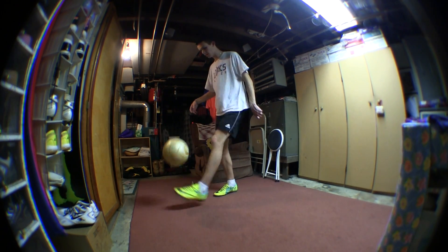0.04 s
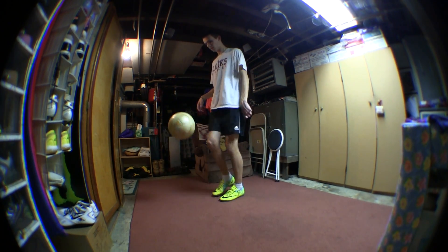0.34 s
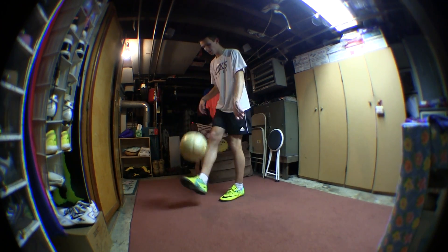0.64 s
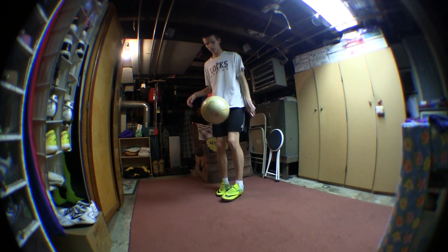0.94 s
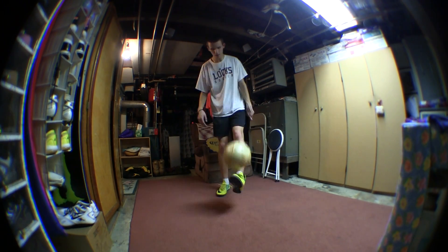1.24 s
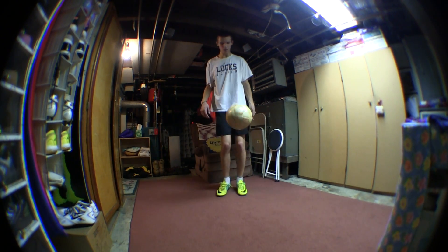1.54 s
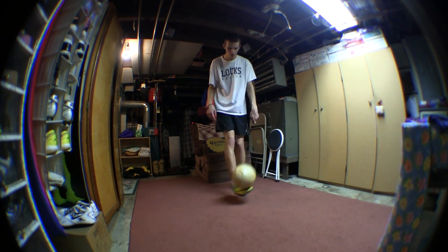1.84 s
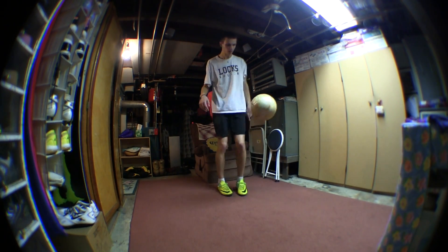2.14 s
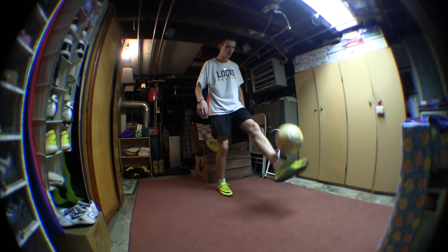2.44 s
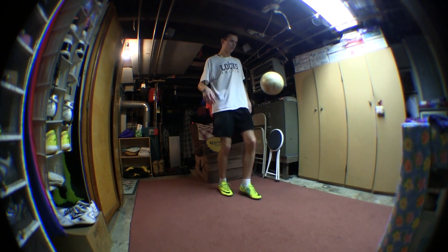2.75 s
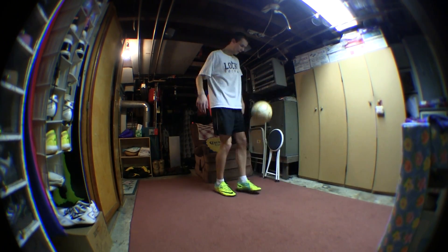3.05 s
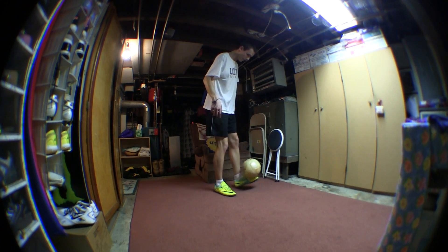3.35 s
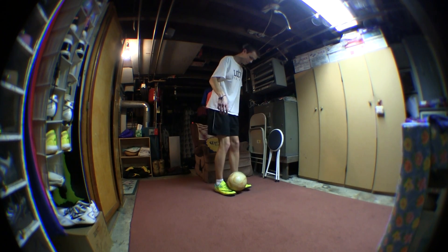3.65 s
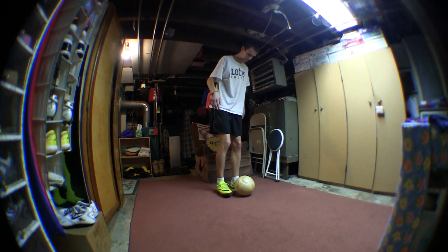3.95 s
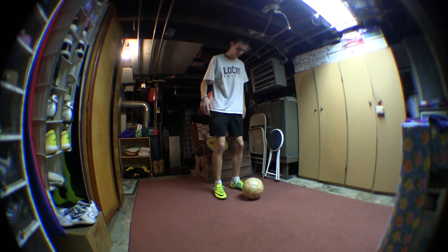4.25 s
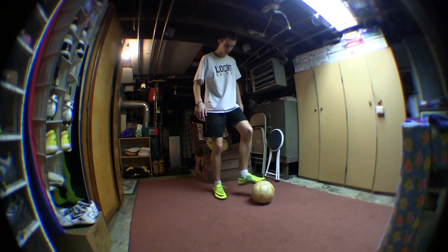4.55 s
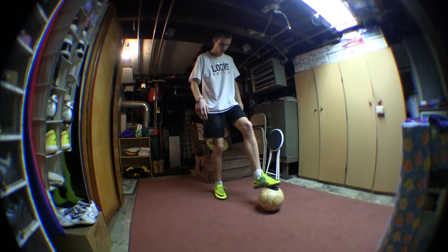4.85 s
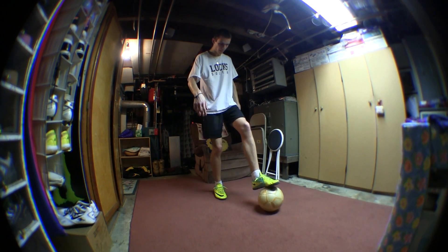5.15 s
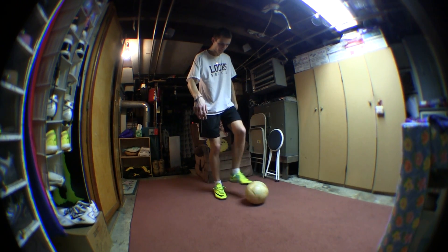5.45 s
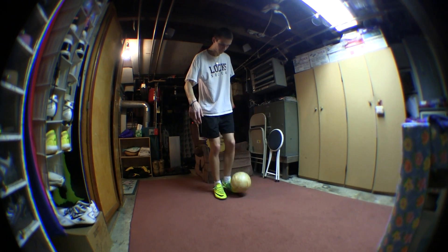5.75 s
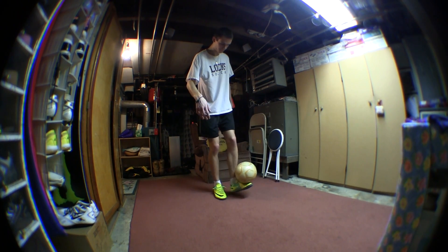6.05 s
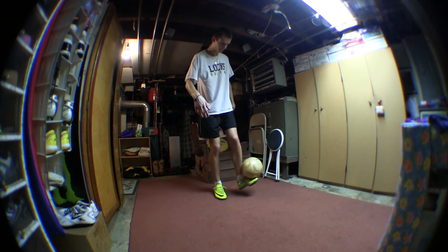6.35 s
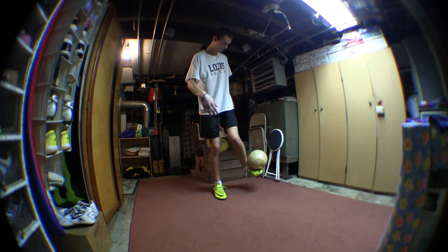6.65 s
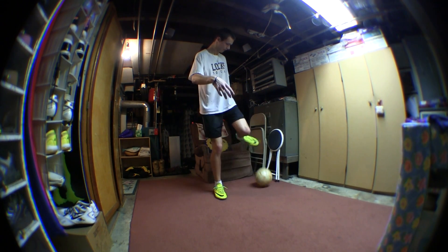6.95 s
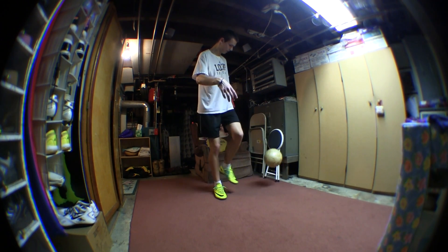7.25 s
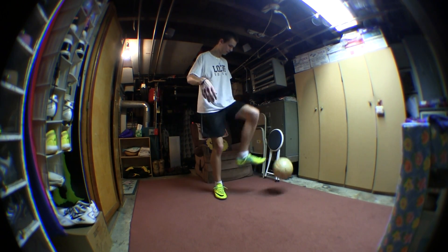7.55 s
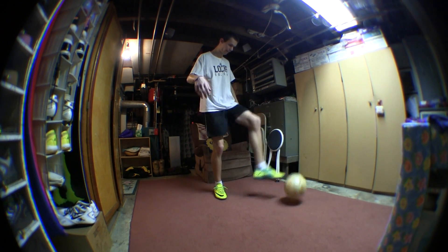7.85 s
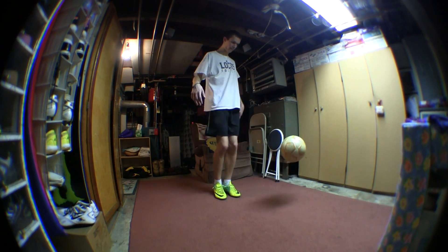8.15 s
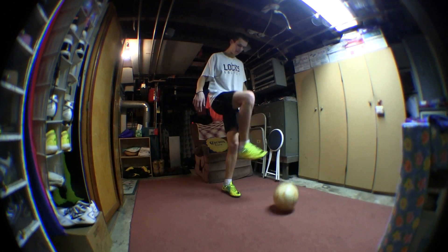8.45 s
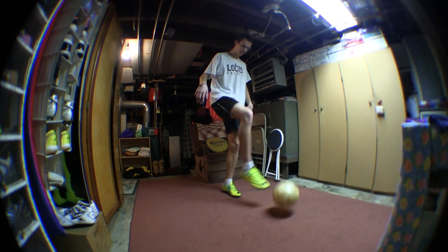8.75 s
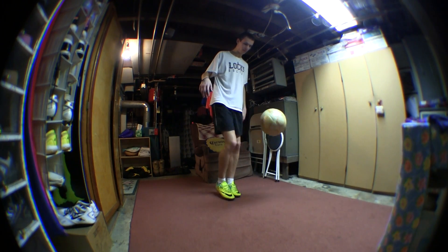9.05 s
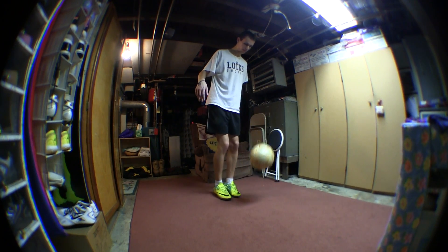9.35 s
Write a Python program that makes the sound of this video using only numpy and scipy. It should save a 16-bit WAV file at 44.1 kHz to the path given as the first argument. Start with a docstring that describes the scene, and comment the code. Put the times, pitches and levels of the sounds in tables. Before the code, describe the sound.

A football is kicked with sharp slaps, rolled softly, then thumped into carpet in a small room with a fan humming faintly.

```python
"""A football is juggled on shoe and thigh in a cluttered, carpeted basement, then rolled under the sole
and slapped down into the floor three times. Each blow is a pulse that rings the air in the ball and the
low modes of the room. Between kicks the ball brushes the leg, shoes scuff and clothes rustle.
Underneath, the fan of a nearby machine lays down a soft bed of air and hum."""
import sys
import numpy as np
from scipy import signal
from scipy.fft import rfft, irfft
from scipy.io import wavfile

SR = 44100
rng = np.random.default_rng(int(sys.argv[2]) if len(sys.argv) > 2 else 0)


def store_pcm(level_fs):
    """Save levels as 16-bit WAV."""
    pcm = np.round(np.clip(level_fs, -1, 1) * 32767).astype(np.int16)
    wavfile.write(sys.argv[1], SR, np.atleast_2d(pcm).T)


N = 414099
SIZE = 32768  # samples in a one-shot
T = np.arange(SIZE) / SR
HZ = np.arange(SIZE // 2 + 1) * SR / SIZE


def undb(db):
    """Decibels to gain."""
    return np.exp(np.asarray(db) * np.log(10) / 20)


def level(x, db):
    """Scale to an rms level."""
    return x * undb(db) / np.sqrt(np.mean(x ** 2))


def curve(points, hz):
    """Join (frequency, value) points on a log-frequency axis."""
    f, value = np.transpose(points)
    return np.interp(np.log(np.maximum(hz, 1)), np.log(f), value)


def causal(points):
    """Minimum-phase response of an EQ curve: nothing sounds before the blow."""
    cepstrum = irfft(np.log(undb(curve(points, HZ))))
    cepstrum[1:SIZE // 2] *= 2
    cepstrum[SIZE // 2 + 1:] = 0
    return np.exp(rfft(cepstrum))


def eq(x, points):
    """Colour a sound by (frequency [Hz], gain [dB]) points."""
    return signal.fftconvolve(x, irfft(causal(points)))[:len(x)]


def cut(x, hz, kind, order=2):
    """Butterworth filter."""
    return signal.sosfilt(signal.butter(order, hz, kind, fs=SR, output="sos"), x)


def band(x, hz, width_hz):
    """One resonance, gain 1 at its centre."""
    return signal.lfilter(*signal.iirpeak(hz, hz / width_hz, fs=SR), x)


def ring(modes):
    """Impulse response of damped modes, each with its dB as the gain at resonance."""
    hz, db, t60 = np.transpose(modes)[:, :, None]
    damping = np.log(1000) / t60
    envelopes = 2 * damping / SR * undb(db) * np.exp(-damping * T)
    return np.sum(envelopes * np.cos(2 * np.pi * hz * T), axis=0)


def stereo(mid, side):
    """Left and right from mid and side."""
    return np.array([mid + side, mid - side])


def add(out, s, sound):
    """Drop a one-shot into a track at a time."""
    i = int(s * SR)
    out[..., i:i + SIZE] += sound[..., :N - i]


def gesture(s, rise, hold, fall):
    """Envelope of one movement: it builds up, then dies away from `hold` seconds after its start."""
    t = np.arange(N) / SR - s
    return np.clip(t / rise, 0, 1) * np.exp(-np.maximum(t - hold, 0) / fall)


def friction(length, rise, fall, rough):
    """Uneven grains of a rub, and the envelope of its stroke."""
    grains = rng.standard_normal(SIZE) * np.exp(rough * np.repeat(rng.standard_normal(SIZE // 32), 32))
    return level(grains, 0), gesture(0, rise, length, fall)[:SIZE]


# EQ of the fan's air, and the further EQ of its side channel: (frequency [Hz], gain [dB])
FAN_AIR = [(18, -43.5), (30, -7.5), (86, -10.5), (124, -3.5), (149, -10.5), (184, -8.5), (328, -9.5),
           (355, -3.5), (473, -9.5), (666, -6), (866, -12), (2610, -14.5), (16000, -27.5)]
FAN_WIDTH = [(60, -12.5), (110, -8.5), (200, -1), (380, -2), (700, -3.5), (1290, -4.5), (2380, -8.5),
             (4400, -8), (8120, -6.5), (15000, -4.5)]
# tones of motor and housing: (frequency [Hz], relative level [dB])
HUM_TONES = [(120, -98.5), (180, -78.5), (360, -86.5), (511, -73.5), (574, -75), (630, -76), (665, -81),
             (802, -77), (1437, -79), (1620, -80.5), (1705, -78)]
# the hum slowly dips and swells: (time [s], gain [dB])
HUM_SWELL = [(0, 4), (5.2, -1.5), (6.5, 1.2), (9.3, 3)]


def machine(air_db=-60.64, hum_trim_db=-1, waver=5):
    """A fan: an even bed of air under the wavering tones of its motor and housing."""
    mid, side = (level(eq(rng.standard_normal(N), FAN_AIR), air_db) for _ in range(2))
    air = stereo(mid, eq(side, FAN_WIDTH))
    t = np.arange(N) / SR
    knots = np.arange(0, t[-1] + 1, 1 / 24)
    hum = 0
    for hz, db in HUM_TONES:
        drift_hz = np.interp(t, knots, waver * rng.standard_normal(len(knots))) * np.sqrt(hz / 500)
        tone = np.sin(2 * np.pi * np.cumsum(hz + drift_hz) / SR)
        hum = hum + level(tone, db + hum_trim_db)
    return air + hum * undb(np.interp(t, *np.transpose(HUM_SWELL)))


# a foot slides or rolls the ball over the carpet: (time [s], length [s], level [dB])
FOOT_SLIDES = [(1.654, 0.091, -61.5), (2.97, 0.27, -62.5), (4.246, 0.1, -60.5), (4.483, 0.18, -59.5),
               (4.705, 0.21, -62.5), (5.398, 0.35, -64.5), (5.98, 0.06, -60.5), (6.48, 0.047, -61.5),
               (8.238, 0.27, -63.5)]


def rustle(stir_db=-79, swing_db=-40.5, flicker_db=2.0, side_db=-7):
    """Cloth and carpet fibres catch and slip as the body stirs, a leg swings or a foot slides."""
    fibres = [(300, -2.5), (900, 1.5), (1600, 1.5), (2200, 1.0), (3200, -3.5), (5200, -5.5),
              (8000, -17.5), (16000, -19)]
    mid, side = (level(eq(rng.standard_normal(N), fibres), db) for db in (0, side_db))
    catches = level(cut(rng.standard_normal(N), 30.4, "lowpass"), 0)
    # the leg swings back after each kick, louder after a stronger one
    swings = [undb(db + swing_db) * gesture(s, rise=0.17, hold=0.36, fall=0.29) for s, db, *_ in KICKS]
    slides = [undb(db) * gesture(s, rise=0.032, hold=length, fall=0.13) for s, length, db in FOOT_SLIDES]
    motion = np.sqrt(undb(stir_db) ** 2 + sum(move ** 2 for move in swings + slides))
    return stereo(mid, side) * motion * undb(flicker_db * catches)


# shoe and cloth foley: (time [s], length [s], level [dB], centre [Hz], bandwidth [Hz])
SCUFFS = [(0.029, 0.003, -47, 2030, 3030), (.958, 0.015, -41.5, 1560, 1300), (1.262, .003, -50, 2250, 1800),
          (1.494, 0.011, -48, 1490, 1200), (1.664, 0.0076, -53, 13500, 900), (1.739, 0.067, -62, 2050, 800),
          (2.037, 0.072, -56, 1980, 800), (2.875, 0.078, -54.5, 2190, 4470),
          (2.914, .035, -60.5, 5500, 2400), (4.332, .008, -57, 7000, 11000),
          (4.84, 0.011, -51.5, 7200, 10100), (5.033, 0.0033, -52, 2400, 3000),
          (5.517, 0.028, -58, 3100, 3460), (5.614, .02, -61, 4370, 3500), (5.738, .0071, -45.5, 5200, 2400),
          (5.912, 0.024, -61, 3500, 5000), (7.53, 0.041, -55.5, 1550, 2200),
          (8.18, 0.031, -55.5, 2630, 5400)]


def scuffs():
    """Shoes and clothes scuff and squeak: short strokes of friction through a resonant band."""
    out = np.zeros(N)
    for s, length, db, hz, width_hz in SCUFFS:
        grains, stroke = friction(length, rise=0.057 * length, fall=0.23 * length, rough=0.17)
        squeak = band(band(grains, hz, width_hz), hz, width_hz)
        add(out, s, stroke * level(squeak, db))
    return out


# reverb time of the basement: (frequency [Hz], t60 [s])
ROOM_DECAY = [(300, 0.19), (1000, 0.2), (3000, 0.16), (6000, 0.16), (14000, 0.13)]


def reverb(burst_db=4, burst_t60=0.11, tail_db=6.0, grain=0.88, low_cut_hz=330, treble_db=-4):
    """Diffuse reflections: a quick grainy burst from the clutter, then the tail of the room."""
    spectrum = rfft(rng.standard_normal(SIZE))
    centres = np.transpose(ROOM_DECAY)[0]
    tail = sum(irfft(spectrum * curve(np.c_[centres, share], HZ)) * undb(-60 * T / t60)
               for share, (_, t60) in zip(np.eye(len(centres)), ROOM_DECAY))
    burst = rng.standard_normal(SIZE) * np.exp(grain * rng.uniform(-0.77, 1.97, SIZE))
    burst *= undb(-60 * T / burst_t60)
    wet = undb(burst_db) * burst / np.linalg.norm(burst) + undb(tail_db) * tail / np.linalg.norm(tail)
    absorbed = (1 - undb(treble_db)) * cut(wet, 3000, "highpass", order=1)  # by carpet and cloth
    return cut(wet - absorbed, low_cut_hz, "highpass")


# EQ of the reverb's side channel: (frequency [Hz], gain [dB])
ROOM_WIDTH = [(100, -9), (500, -18), (1200, -13.5), (2800, -11.5), (5500, -8.5), (9000, 0), (14000, -6.5)]


def in_room(mono, send_db=-6, trim_db=-3):
    """The basement's reflections spread a mono sound into stereo."""
    mid, side = (undb(send_db) * signal.fftconvolve(mono, reverb())[:N] for _ in range(2))
    return undb(trim_db) * (mono + stereo(mid, eq(side, ROOM_WIDTH)))


# a quick second pulse from the air inside the ball, then slap off the nearest surfaces: (delay [ms], gain
# [linear])
EARLY_ECHOES = [(.7, -0.16), (2.8, -0.57), (5.0, -0.36), (7.2, -0.28), (11.7, -0.39), (17, -0.14),
                (19, 0.45), (48, 0.053)]


def early_paths(direct):
    """A blow arrives straight, echoes once inside the ball, then comes off the nearest surfaces."""
    paths = np.zeros(SIZE)
    for ms, gain in EARLY_ECHOES:
        paths[int(ms * SR / 1000)] += gain
    paths = cut(paths, 446, "highpass", order=1)  # small surfaces return no bass
    paths[0] += direct
    crack = cut(signal.unit_impulse(SIZE), 2500, "highpass", order=1)  # mostly takes the straight path
    return paths + .8 * crack


# ping of the air in the ball, and boom of the basement: (frequency [Hz], gain [dB], t60 [s])
BALL_MODES = [(865, 16.5, 0.16), (936, 12.5, 0.07), (1021, 4, 0.06), (1132, 4.5, .19), (1152, 13, 0.152),
              (1228, 14.5, 0.1), (1345, 2.5, 0.138), (1475, 1, 0.072), (1810, 15, 0.042), (2163, 2, 0.209),
              (2165, 12.5, 0.1), (2600, -8, 0.19), (3805, 4, 0.1), (4455, 15, .16), (4460, -2.5, 0.13),
              (5070, 6.5, .16), (5500, 3.5, 0.158)]
ROOM_MODES = [(63, 5.5, 1), (76.8, 19, 0.19), (85.9, -0.5, 1), (111.8, 12.5, 0.12), (130, 5, 0.15),
              (164.9, 6.5, 0.18), (180.8, 9, .22), (216.5, -1, .2), (269, 5.5, 0.27), (307.6, 11, 0.13),
              (346.5, 6.5, 0.28), (375.4, 10.5, 0.17), (420, 7.5, 0.21), (549, 7.5, 0.28), (647, 6.5, 0.23)]
# borders of the thump, knock, slap, crack and tick registers: (frequency [Hz])
REGISTER_EDGES = [50, 220, 700, 2200, 7000, 16000]


def blows(hits, contact, balance_db, body, trim_db, ball_db, low_cut_hz, direct=0.32, dent_t60=0.0182):
    """Each contact rings the dented skin, the ball and the room; a harder one tilts towards the treble."""
    out = np.zeros((2, N))
    clear = early_paths(direct) + body + undb(ball_db) * ring(BALL_MODES)
    push = rfft(cut(irfft(causal(contact)), low_cut_hz, "highpass", order=3))
    edges = np.array(REGISTER_EDGES)
    centres = np.sqrt(edges[:-1] * edges[1:])
    bins = np.searchsorted(HZ, edges)
    octaves = np.log2(centres / np.median(centres))
    width = causal(ROOM_WIDTH)
    for s, db, hardness, knock_db, *dent in hits:
        register_db = db + np.array(balance_db) + hardness * octaves
        register_db[1] += knock_db  # fuller or leaner low mids
        pulse = push * (1.3 + rfft(ring([(*dent, dent_t60)]))) if dent else push
        mid = rfft(clear + reverb()) * pulse
        side = rfft(reverb()) * pulse * width
        eq_db = np.zeros(len(centres))
        for _ in range(3):  # EQ each register to its level, as energy per 50 ms
            power = abs(mid * undb(curve(np.c_[centres, eq_db], HZ))) ** 2
            energy = np.add.reduceat(power, bins)[:-1] * 2 / SIZE / (.05 * SR)
            eq_db += register_db - 10 * np.log10(energy)
        tone = causal(np.c_[centres, eq_db]) * undb(trim_db)
        add(out, s, irfft(stereo(mid, side) * tone))
    return out


# shoe on ball: (time [s], level [dB], hardness [dB/octave], knock [dB], dent [Hz], dent gain [dB])
KICKS = [(0.0539, -19, 0.14, .3, 1480, 9), (0.6483, -21, -0.07, 2.5, 1240, 11),
         (1.2924, -22.5, -.9, 2, 910, -9), (1.9297, -20, 0.85, 2, 2060, 3),
         (2.5524, -22.5, -1.02, -.5, 640, 2), (3.3303, -24.5, -0.63, 0.5, 940, -15),
         (7.1425, -30.5, 0.3, 3.5, 1180, 1), (7.8816, -24, .5, -1.5, 1080, 8),
         (8.7381, -24, -0.36, -3.5, 750, 2)]
# colour of a shoe's contact: (frequency [Hz], gain [dB])
SHOE_EQ = [(60, -17.5), (120, -0.5), (250, 1), (520, 1.5), (780, 1), (1000, 5.5), (1600, 4), (2100, 0.5),
           (4500, -5), (6300, -13.5), (8500, -25.5), (12500, -26), (16000, -33.5)]
# voicing of a kick: (thump [dB], knock [dB], slap [dB], crack [dB], tick [dB])
KICK_VOICING = (-2.5, -3.5, 0, -3, -16)


def kicks(boom):
    """The shoe dents the ball: a bright slap, then the ping of the air inside."""
    return blows(KICKS, SHOE_EQ, KICK_VOICING, boom, trim_db=-0.5, ball_db=-2.5, low_cut_hz=65)


# ball along the leg: (time [s], length [s], rub [dB], hollow [dB], glide start [Hz], glide end [Hz])
LEG_BRUSHES = [(0.219, .086, -39, -42.5, 1022, 510), (0.872, 0.058, -39.5, -33.5, 1179, 470.6),
               (1.519, 0.0425, -37, -41.5, 860, 456), (2.153, 0.05, -44, -60, 767, 405)]


def brushes(flutter_hz=220):
    """The ball bumps and rubs the leg while the hollow between them sinks in pitch."""
    rub_eq = [(60, -27), (200, 4), (500, 1.5), (1000, -2.5), (2000, -4.5), (4500, -10), (6500, -20),
              (9000, -31.5), (16000, -39)]
    out = np.zeros(N)
    for s, length, rub_db, hollow_db, start_hz, end_hz in LEG_BRUSHES:
        grains, stroke = friction(length, rise=0.002, fall=0.0053, rough=0.66)
        rub = level(eq(grains, rub_eq), rub_db)
        bump = level(band(grains, hz=150, width_hz=160), rub_db - 1.5) * np.exp(-T / 0.025)
        glide_hz = start_hz * (end_hz / start_hz) ** np.minimum(T / length, 1)
        flutter = cut(rng.standard_normal((2, SIZE)), flutter_hz, "lowpass")
        hollow = np.real((flutter[0] + 1j * flutter[1]) * np.exp(2j * np.pi * np.cumsum(glide_hz) / SR))
        # the hollow opens as the ball leaves
        swell = gesture(0, rise=length / 2, hold=length, fall=0.0031)[:SIZE]
        add(out, s, bump + stroke * (rub + level(hollow, hollow_db) * swell))
    return out


# footfalls: (time [s], level [dB], hardness [dB/octave], knock [dB])
STEPS = [(.543, -61, 1, 6.5), (2.972, -56, -0.5, -3.5), (3.868, -60, 1.5, 1), (3.935, -63, 0.5, -5),
         (4.579, -54.5, -0.9, 2), (4.85, -66.5, -3, -1.5), (8.14, -55, -1.3, -13.5)]
# voicing of a step: (thump [dB], knock [dB], slap [dB], crack [dB], tick [dB])
STEP_VOICING = (-3, 4.5, -0.5, -6.5, -22)


def steps(boom):
    """A sole is set down with a soft knock."""
    return blows(STEPS, SHOE_EQ, STEP_VOICING, boom,
                 trim_db=-0.5, ball_db=-26.5, low_cut_hz=55, direct=.2)


# ball on thigh: (time [s], level [dB], hardness [dB/octave], knock [dB], dent [Hz], dent gain [dB])
THIGH_HITS = [(2.8112, -31.5, 0.5, 0.5, 547, 5)]
# colour of a contact with flesh: (frequency [Hz], gain [dB])
FLESH_EQ = [(60, -33), (140, -26), (220, -7), (550, -21), (850, -25), (1200, -35), (2400, -25),
            (4600, -16.5), (8000, -34), (16000, -51)]
# the hollow between ball and thigh: (frequency [Hz], gain [dB], t60 [s])
THIGH_MODES = [(322, 17.5, 0.13), (530, 4, 0.04), (740, 7.5, 0.041)]
# voicing of the thigh: (thump [dB], knock [dB], slap [dB], crack [dB], tick [dB])
THIGH_VOICING = (0, 9, -2.5, -15, -34.5)


def thigh(boom):
    """The ball lands on the thigh and rings the hollow between them: a round knock, hardly any ping."""
    body = undb(-1.0) * boom + ring(THIGH_MODES)
    return blows(THIGH_HITS, FLESH_EQ, THIGH_VOICING, body, trim_db=2.5, ball_db=-27, low_cut_hz=62)


# light touches on the ball, and a shoe scuff at 6.03 s: (time [s], level [dB], hardness [dB/octave], knock
# [dB])
TAPS = [(3.536, -48, 1.5, 2.5), (3.743, -43.5, .2, 0.5), (5.766, -47, -1.5, -1), (6.032, -62, 4, 8)]
# voicing of a tap: (thump [dB], knock [dB], slap [dB], crack [dB], tick [dB])
TAP_VOICING = (-5.5, -2.5, 0, -4.5, -17)


def taps(boom):
    """The foot taps the ball too lightly to dent it; the last is a scuff of the shoe."""
    return blows(TAPS, SHOE_EQ, TAP_VOICING, boom, trim_db=-2.5, ball_db=-10, low_cut_hz=50, direct=.2)


# ball on carpet: (time [s], level [dB], hardness [dB/octave], knock [dB], dent [Hz], dent gain [dB])
BOUNCES = [(7.0535, -31, 1.7, -3.4, 1300, 4), (7.195, -31.5, 0, -1, 880, -4),
           (7.7292, -31.5, 0.25, -1, 940, 6), (7.9617, -27, -0.05, 1, 1010, 10),
           (8.5541, -31.5, 0.16, -2.5, 860, 0), (8.8205, -24, -0.35, 3, 1225, 24)]
# colour of a contact with carpet: (frequency [Hz], gain [dB])
CARPET_EQ = [(60, 11), (120, 13.5), (350, -6), (560, -10.5), (760, -13), (1050, -10), (1500, -13),
             (2300, -20.5), (4000, -36), (6000, -50.5), (9000, -61), (16000, -66)]
# voicing of a bounce: (thump [dB], knock [dB], slap [dB], crack [dB], tick [dB])
BOUNCE_VOICING = (9, 4, -0.5, -10, -38)


def bounces(boom):
    """The ball hits the carpet: a dark, heavy thump that rings the air inside."""
    return blows(BOUNCES, CARPET_EQ, BOUNCE_VOICING, boom, trim_db=-3, ball_db=0.5, low_cut_hz=61.5)


def scene():
    """Ball hits up front, footwork foley behind them, the machine as the bed."""
    boom = ring(ROOM_MODES)
    hits = kicks(boom) + bounces(boom) + thigh(boom) + taps(boom)
    foley = steps(boom) + in_room(brushes() + scuffs()) + rustle()
    return hits + foley + machine()


def record(dry, top_hz=15850):
    """Master chain: a hard clip at full scale, then a steep high cut."""
    high_cut = signal.ellip(8, .2, 70, top_hz, fs=SR, output="sos")
    return signal.sosfilt(high_cut, np.clip(dry, -1, 1))


dry = scene()
out = record(dry)
store_pcm(out)
```